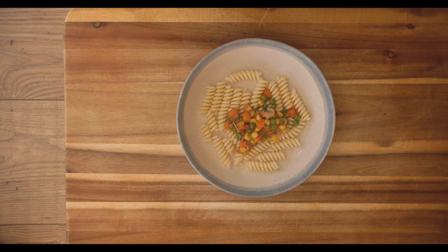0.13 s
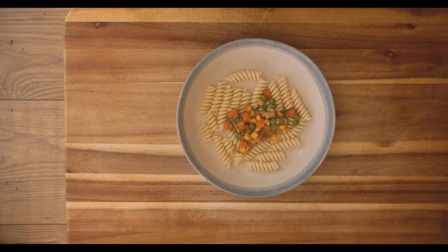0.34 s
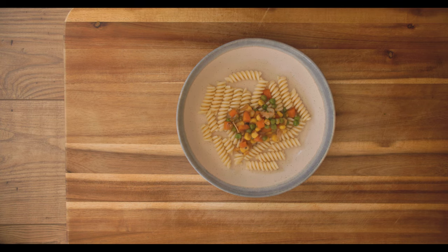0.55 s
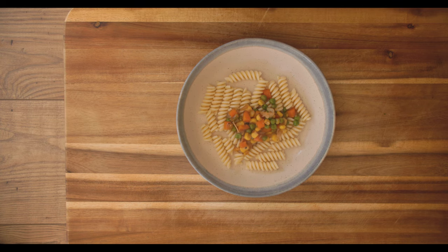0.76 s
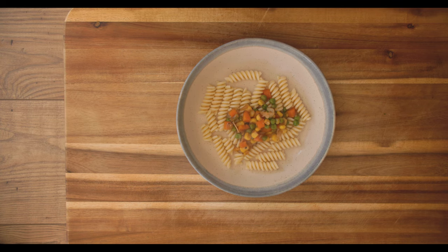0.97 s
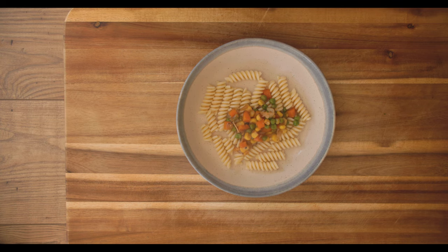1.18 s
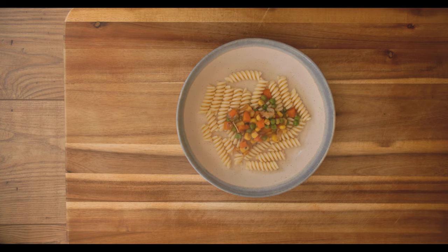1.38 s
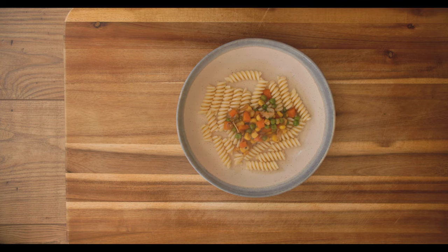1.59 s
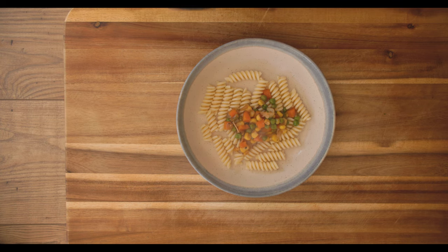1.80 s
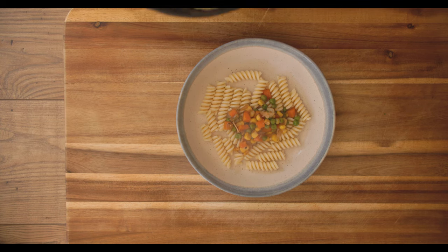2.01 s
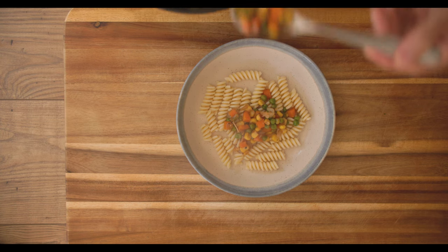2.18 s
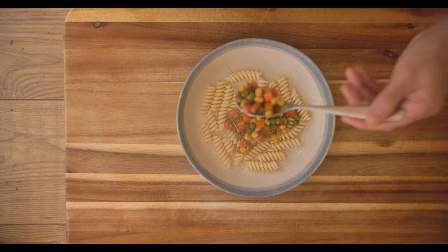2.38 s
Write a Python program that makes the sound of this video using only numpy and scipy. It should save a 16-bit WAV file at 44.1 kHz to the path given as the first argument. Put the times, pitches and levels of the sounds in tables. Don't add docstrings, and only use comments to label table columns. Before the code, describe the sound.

Metal spoon scraping in a pan: two sharp ringing knocks, a rasp, then another knock and softer strokes

```python
import sys
import numpy as np
from scipy import signal
from scipy.fft import rfft, irfft
from scipy.io import wavfile
from scipy.ndimage import uniform_filter1d

SR = 44100
rng = np.random.default_rng(int(sys.argv[2]) if len(sys.argv) > 2 else 0)


def to_linear_factor(level_db):
    exponent = np.asarray(level_db, float) / 20
    return 10 ** exponent


def master_out(mix):
    frames = np.transpose(np.atleast_2d(mix))
    ceiling = np.clip(frames, -1, 1)
    pcm = np.round(ceiling * 32767).astype(np.int16)
    wavfile.write(sys.argv[1], SR, pcm)


N = 108045

# (time [s], peak level [dB])
TAPS = [
    (0.197, 2.5),
    (0.32, 0.5),
    (1.05, 1),
]
# (named modes [dB], crowd [dB], brightness [dB per octave], crack [dB])
TAP_MIX = [(-8, -11, 0.57, -18), (-4, -12.5, 4.5, -40), (-9.5, -11.5, 6, -9)]
THUD_LEVELS = [-38, -33, -41]
# (level [dB], t60 [s])
FIRST_TAP_HZ = [662, 1300, 1620, 1852, 2196, 3214, 3994, 4194, 4716, 5862, 8080, 9286, 11850]
FIRST_TAP_MODES = [(-14.5, 0.17), (-18, 0.19), (-22, 0.21), (-7.5, 0.23), (-8.5, 0.36), (-4.5, 0.2),
                   (-3.5, 0.14), (-7.5, 0.23), (-7.5, 0.16), (-16.5, 0.36), (-49, 0.11), (-42, 0.16),
                   (-35, 0.065)]
# (pitch [Hz], level [dB], t60 [s])
SECOND_TAP_MODES = [(662, -17.5, 0.24), (1305, -22, 0.058), (2200, -17, 0.041), (3350, -7, 0.046),
                    (4530, -2, 0.023), (5040, -10.5, 0.028), (6500, -21, .03), (7970, -8, 0.038),
                    (11960, -13, .07), (11900, -20, .05)]
# (level [dB], t60 [s])
THIRD_TAP_HZ = [668, 1306, 1895, 2378, 2912, 4440, 4732, 5245, 5500, 6853, 8030, 11900]
THIRD_TAP_MODES = [(-13, 0.2), (-7.5, 0.073), (-7, 0.16), (-2, 0.053), (-14, 0.11), (-1.5, 0.037),
                   (-8.5, 0.032), (-12, 0.19), (7, 0.014), (-21, 0.027), (-12.5, 0.081), (-19, 0.065)]
# (pitch [Hz], level [dB per Hz])
CROWD_SPECTRUM = [(150, -56), (250, -30.5), (659, -13.5), (916, -16.5), (3300, -2.5), (8120, -10),
                  (10700, -20), (12100, -23.5), (15700, -74.5)]
# (time [s], level [dB])
DRAGS = [
    [(.25, -38), (.302, -26), (.305, -8), (.316, -26), (.3185, -50), (.335, -14), (.4, -16.5), (.435, -16),
     (.45, -58)],
    [(.452, -42), (.463, -16.5), (.475, -26), (.505, -23.5), (.518, -63)],
    [(1.06, -21), (1.11, -24), (1.15, -22.5), (1.175, -33), (1.195, -18.5), (1.215, -37.5), (1.235, -47)],
    [(1.24, -45.5), (1.33, -39), (1.37, -28.5), (1.39, -40), (1.41, -30.5), (1.43, -54), (1.455, -34.5),
     (1.475, -53)],
    [(1.495, -29), (1.503, -37.5), (1.52, -31.5), (1.532, -46), (1.55, -33.5), (1.57, -41), (1.59, -56)],
    [(1.5, -51), (1.6, -54), (1.66, -55.5), (1.75, -64.5)],
]
# (slips [per s], size spread [dB], crowd [dB], brightness [dB per octave], grit [dB])
DRAG_MIX = [(2520, 4, -1, -1.5, -21), (1580, 3.5, 0, -1, -28), (2658, 3, -2.5, -2, -19.5),
            (2200, 3, -1.5, 1.5, -32), (2070, 4.5, -8, -3.5, -14), (4870, 1, 9, 1.5, 6)]
# (pitch [Hz], width [Hz], level [dB])
SPOT_FIRST_SCRAPE = [(662, 29, -1), (1290, 47, -4), (2200, 31, 0), (2480, 75, -6), (2970, 57, -6),
                     (3220, 58, 0), (4190, 70, -3), (4730, 60, -7), (5300, 200, -5), (6190, 130, -11),
                     (7240, 49, -10), (8070, 73, -6), (11900, 60, -11), (12200, 60, -14)]
SPOT_SCRAPE_TAIL = [(660, 60, -4), (1290, 80, -4), (1900, 250, -4), (2200, 80, -3), (3250, 170, 0),
                    (4380, 180, -1), (8070, 110, -12), (11900, 120, -14)]
SPOT_SECOND_DRAG = [(680, 50, 2), (515, 40, -5), (1305, 60, -2), (1870, 60, -1), (2385, 50, 0),
                    (2930, 70, 0), (4500, 80, 1), (5300, 140, 2), (7000, 260, -3), (8030, 80, -4),
                    (11800, 130, -7), (15000, 350, -17)]
SPOT_LIGHT_STROKE = [(657, 30, 3), (1300, 130, -5), (1880, 67, -8), (2440, 62, -3), (3280, 60, -4),
                     (3610, 200, -4), (4180, 60, -1), (4570, 130, -5), (5810, 90, -9), (6850, 160, -3),
                     (7600, 100, -1), (11550, 120, -4), (14700, 400, -21)]
SPOT_LAST_STROKE = [(673, 40, 3), (349, 50, 3), (2090, 140, -10), (3150, 200, -2), (4300, 160, -6),
                    (480, 60, -2), (7130, 120, -7), (7800, 160, -1), (11200, 140, -12), (11800, 110, -11)]
# (time [s], peak level [dB], centre pitch [Hz])
KNOCKS = [(.262, -23, 432), (.285, -12, 430), (0.339, 3, 4150), (.346, -21, 5170), (0.3714, -5, 2540),
          (.414, 1, 3250), (0.4178, 0.5, 3000), (0.429, 1.5, 3340), (0.466, 4, 4380), (0.49, -26, 4340),
          (0.5024, -2, 4375), (1.1378, -4, 6770), (1.1483, -6, 2820), (1.161, -9, 7000), (1.182, -9, 5700),
          (1.1895, -36, 4740), (1.203, -18, 2340), (1.2552, -18, 2500), (1.2853, -39, 2410),
          (1.304, -19.5, 6750), (1.347, -19, 3350), (1.3645, -9, 3720), (1.368, -13, 7100),
          (1.392, -23, 646), (1.4016, -18, 4180), (1.43, -25, 645), (1.455, -25, 670), (1.4983, -34, 3000),
          (1.518, -24, 3100), (1.5434, -32, 3200)]
# (time [s], peak level [dB], centre pitch [Hz])
TICKS = [(.526, -48, 14500), (.555, -52, 14500), (.571, -51.5, 13400), (0.586, -35, 11000),
         (0.6073, -31, 6500), (.737, -38.5, 5960), (.8335, -38, 5870), (0.8615, -25.5, 7800),
         (1.126, -28, 14500), (1.131, -31, 13100), (1.144, -29.5, 14500), (1.161, -27, 14100),
         (1.196, -18.5, 13500), (1.203, -28.5, 14500), (1.239, -32, 14500), (1.306, -30, 13700),
         (1.35, -25, 14000), (1.3742, -17.5, 5540), (1.4818, -18.5, 14200), (1.52, -29, 13400),
         (1.5711, -20, 8950), (1.8016, -25, 12900)]
# (time [s], pitch [Hz], level [dB])
SQUEAK_LOW = [(1.503, 10700, -57), (1.535, 12600, -59), (1.59, 13200, -60), (1.612, 12700, -62),
              (1.622, 12350, -53), (1.65, 11450, -56), (1.7, 9950, -60), (1.742, 8600, -61)]
SQUEAK_HIGH = [(1.612, 15900, -63), (1.628, 15750, -57), (1.645, 14800, -59), (1.665, 13300, -55),
               (1.69, 12250, -56), (1.715, 11300, -59)]
# (pitch [Hz], level [dB per Hz])
HUM_SPECTRUM = [(12, -42), (20, -9.5), (74, -14.5), (149, -2), (418, -6.5), (1020, -9), (1170, -12),
                (2860, -13.5), (15700, -30)]
# (pitch [Hz], width [Hz], level [dB])
HUM_HUMPS = [(424, 190, 6), (872, 180, 2.7), (2190, 140, 5.9), (3000, 110, 9), (8700, 370, 4.9)]
CROWD_HZ = np.sort(rng.uniform(17, 126, 450)) ** 2

RING = SR // 4
LONGEST_T60_S = 0.12
CROWD_T60_S, CROWD_T60_SLOPE = 0.069, -0.64
TWIN_SPREAD = 0.004
CRACK_LOW_HZ, CRACK_HIGH_HZ, CRACK_DECAY_S = 1220, 8930, 0.00046
SPOT_S, SPOT_SPREAD_DB, GRIT_HZ, DRAG_DB = 0.012, 2.5, 5000, -4.0
KNOCK_WIDTH_OCT, KNOCK_DAMP, KNOCK_DB, KNOCK_RUB_S = 0.71, 0.69, -15.5, 0.0012
KNOCK_OWN_WIDTH_HZ, KNOCK_OWN_DB = 58, 4
TICK_WIDTH = 0.22
SQUEAK_WOBBLE_HZ, SQUEAK_FLUTTER_DB = 80, 4
PAN_LOW_HZ = 365
ROOM_T60_S, ROOM_DB, ROOM_CUT_HZ = 0.33, -7.5, 2500
HUM_DB = -50


def rms_one(x):
    return x / np.sqrt(np.mean(x ** 2) + 1e-20)


def at_hz(points, hz):
    point_hz, db = np.array(points)[:, :2].T
    return np.interp(np.log(hz), np.log(point_hz), db)


def drift(rate_hz):
    r = np.exp(-2 * np.pi * rate_hz / SR)
    noise = rng.standard_normal(N + 9000)
    return rms_one(signal.lfilter([1], [1, -2 * r, r * r], noise)[9000:])


def add(out, s, x):
    i = int(s * SR)
    out[i:i + len(x)] += x[:len(out) - i]


def ringing(hz, db, t60, phase=0):
    t = np.arange(RING)[:, None] / SR
    decay = to_linear_factor(db - 60 * t / np.clip(t60, 0.004, LONGEST_T60_S))
    return decay * np.sin(2 * np.pi * hz * t + phase)


def small_modes():
    t60 = CROWD_T60_S * (CROWD_HZ / 1000) ** CROWD_T60_SLOPE
    return ringing(CROWD_HZ, at_hz(CROWD_SPECTRUM, CROWD_HZ), t60)


def crowd(modes, tilt_db):
    brightness = to_linear_factor(tilt_db * np.log2(CROWD_HZ / 3000))
    x = modes @ (brightness * rng.standard_normal(len(CROWD_HZ)))
    return x / np.sqrt(np.mean(x[:200] ** 2))


def twins(peaks, damp, gain_db=0):
    hz, width, db = np.transpose(peaks)
    level = db + gain_db + 20 * np.log10(width / 50)
    phase = np.pi * np.arange(len(hz))
    total = 0
    for side in (-1, 1):
        pitch = hz * (1 + side * TWIN_SPREAD * (hz / 12000) ** 2)
        total = total + ringing(pitch, level, damp / width, phase).sum(axis=1)
    return total


def taps(modes):
    out, t = np.zeros(N), np.arange(2000) / SR
    spots = (ringing(np.array(FIRST_TAP_HZ), *np.transpose(FIRST_TAP_MODES)),
             ringing(*np.transpose(SECOND_TAP_MODES)),
             ringing(np.array(THIRD_TAP_HZ), *np.transpose(THIRD_TAP_MODES)))
    band = signal.butter(2, [CRACK_LOW_HZ, CRACK_HIGH_HZ], "band", fs=SR, output="sos")
    for (s, db), spot, (modes_db, crowd_db, tilt_db, crack_db) in zip(TAPS, spots, TAP_MIX):
        x = to_linear_factor(modes_db) * spot.sum(axis=1) + to_linear_factor(crowd_db) * crowd(modes, tilt_db)
        burst = rng.standard_normal(2000) * np.exp(-t / CRACK_DECAY_S)
        x[:2000] += to_linear_factor(crack_db) * signal.sosfilt(band, burst)
        add(out, s, to_linear_factor(db) * x)
    return out


def drags(modes):
    out, t = np.zeros(N), np.arange(N) / SR
    high = signal.butter(2, GRIT_HZ, "high", fs=SR, output="sos")
    grit = signal.sosfilt(high, np.arange(RING) == 0)
    spots = (SPOT_FIRST_SCRAPE, SPOT_SCRAPE_TAIL, SPOT_SECOND_DRAG,
             SPOT_LIGHT_STROKE, SPOT_LAST_STROKE, SPOT_LAST_STROKE)
    for rows, peaks, (rate, spread_db, crowd_db, tilt_db, grit_db) in zip(DRAGS, spots, DRAG_MIX):
        s, db = np.transpose(rows)
        sizes = to_linear_factor(spread_db * np.minimum(rng.exponential(1, N), 4)) * rng.choice([-1, 1], N)
        slips = rms_one(sizes * (rng.random(N) < rate / SR))
        pressure_db = np.interp(t, s, db, -140, -140)
        slips = slips * to_linear_factor(2.2 * drift(63) + pressure_db)
        spot = rng.integers(0, 4, N)[(t / SPOT_S).astype(int)]
        near = slice(int(s[0] * SR) - 2000, int(s[-1] * SR) + 2000)
        for k in range(4):
            spot_db = SPOT_SPREAD_DB * rng.standard_normal(len(peaks))
            named = twins(peaks, damp=2.5, gain_db=spot_db)
            small = crowd(modes, tilt_db)
            body = named / np.linalg.norm(named) + to_linear_factor(crowd_db) * small / np.linalg.norm(small)
            body = body + to_linear_factor(grit_db) * grit
            rasp = signal.fftconvolve((slips * (spot == k))[near], body)
            add(out, near.start / SR, to_linear_factor(DRAG_DB) * rasp)
    return out


def spot_under(s):
    if s < 0.4:
        return SPOT_FIRST_SCRAPE
    if s < 1:
        return SPOT_SCRAPE_TAIL
    if s < 1.25:
        return SPOT_SECOND_DRAG
    return SPOT_LIGHT_STROKE


def knocks():
    out = np.zeros(N)
    rise = 1 - np.exp(-(np.arange(RING) / SR / KNOCK_RUB_S) ** 2)
    for s, db, centre_hz in KNOCKS:
        peaks = spot_under(s) + [(centre_hz, KNOCK_OWN_WIDTH_HZ, KNOCK_OWN_DB)]
        octaves_off = np.abs(np.log2(np.array(peaks)[:, 0] / centre_hz))
        x = rise * twins(peaks, damp=KNOCK_DAMP, gain_db=-6.5 * octaves_off / KNOCK_WIDTH_OCT)
        add(out, s, to_linear_factor(db + KNOCK_DB) * 2 * x / np.abs(x).max())
    return out


def thud():
    out = np.zeros(N)
    push = np.exp(-np.arange(SR // 20) / SR / 0.002)
    for (s, _), db in zip(TAPS, THUD_LEVELS):
        add(out, s, to_linear_factor(db) * push)
    return out


def ticks():
    out, t = np.zeros(N), np.arange(-60, 60) / SR
    for s, db, hz in TICKS:
        bell = np.exp(-0.5 * (2 * np.pi * TICK_WIDTH * hz * t) ** 2)
        add(out, s - 60 / SR, to_linear_factor(db) * np.sin(2 * np.pi * hz * t) * bell)
    return out


def squeak(rows):
    s, hz, db = np.transpose(rows)
    t = np.arange(N) / SR
    glide = uniform_filter1d(np.interp(t, s, hz), size=400)
    pitch = glide + SQUEAK_WOBBLE_HZ * drift(100)
    gain = to_linear_factor(np.interp(t, s, db, -140, -140) + SQUEAK_FLUTTER_DB * drift(90))
    return gain * np.sin(2 * np.pi * np.cumsum(pitch) / SR)


def kitchen(x):
    t = np.arange(SR) / SR
    white = rng.standard_normal(SR)
    low = signal.sosfilt(signal.butter(1, ROOM_CUT_HZ, fs=SR, output="sos"), white)
    tail = low * to_linear_factor(-60 * t / ROOM_T60_S) + (white - low) * to_linear_factor(-100 * t / ROOM_T60_S)
    tail = tail * (t > 0.004)
    return to_linear_factor(ROOM_DB) * signal.fftconvolve(x, tail / np.linalg.norm(tail))[:N]


def hum():
    hz = np.fft.rfftfreq(N, 1 / SR) + 1
    db = at_hz(HUM_SPECTRUM, hz)
    for centre_hz, width_hz, hump_db in HUM_HUMPS:
        db = db + hump_db * np.exp(-((hz - centre_hz) / width_hz) ** 2)
    noise = rms_one(irfft(rfft(rng.standard_normal(N)) * to_linear_factor(db), N))
    return to_linear_factor(HUM_DB + 0.5 * drift(2)) * noise


def scene():
    modes = small_modes()
    pan = taps(modes) + drags(modes) + knocks()
    pan = signal.sosfilt(signal.butter(4, PAN_LOW_HZ, "high", fs=SR, output="sos"), pan)
    pan = pan + ticks() + squeak(SQUEAK_LOW) + squeak(SQUEAK_HIGH)
    return (pan + kitchen(pan) + thud() + hum())[None]


def top_cut(x):
    return signal.sosfilt(signal.butter(12, 15830, fs=SR, output="sos"), x)


def record(dry):
    low_pass = signal.cheby2(10, 40, 15800 * 1.02, fs=SR, output="sos")
    mix = np.clip(signal.sosfilt(low_pass, dry), -1.0, 1.0)
    return top_cut(mix)


dry = scene()
out = record(dry)
master_out(out)
```